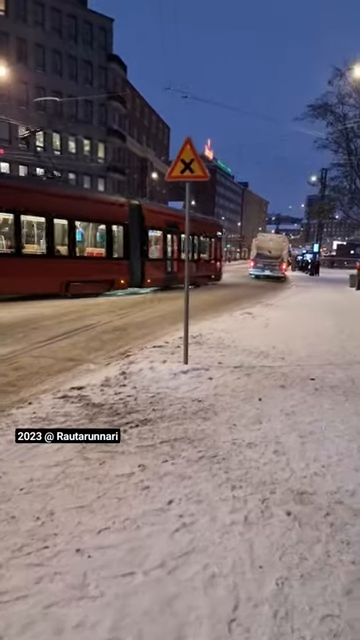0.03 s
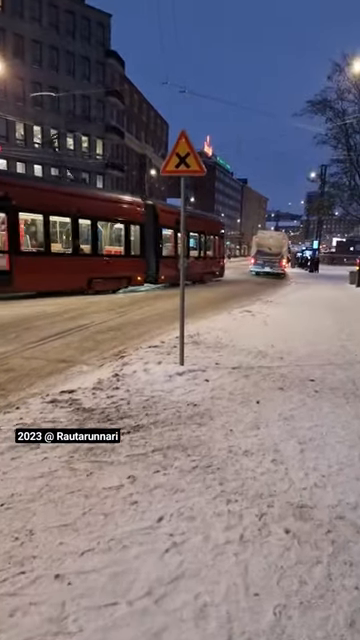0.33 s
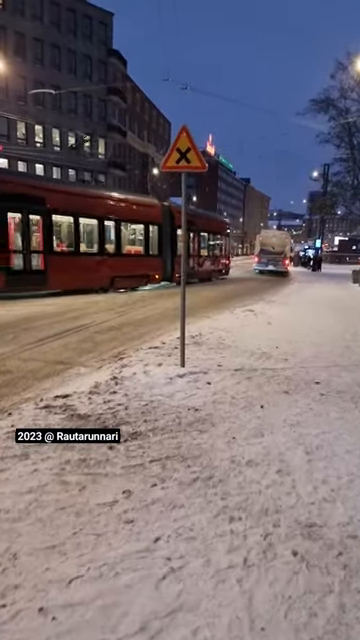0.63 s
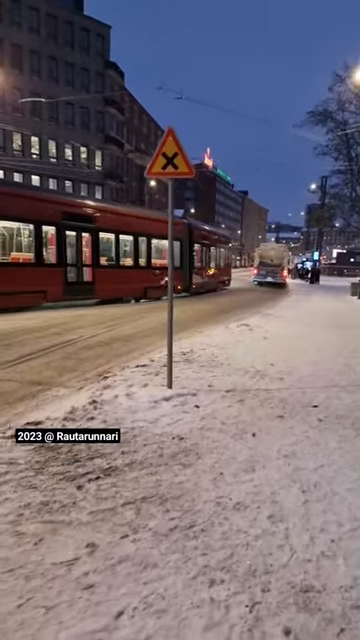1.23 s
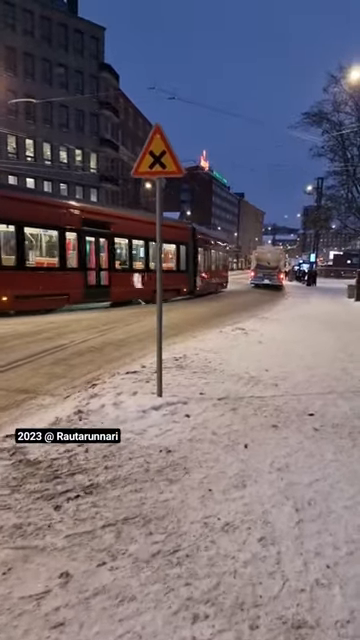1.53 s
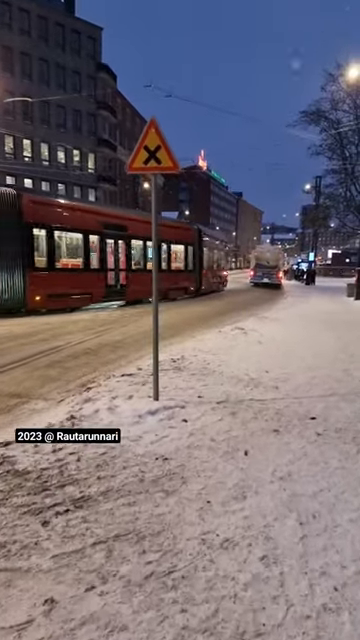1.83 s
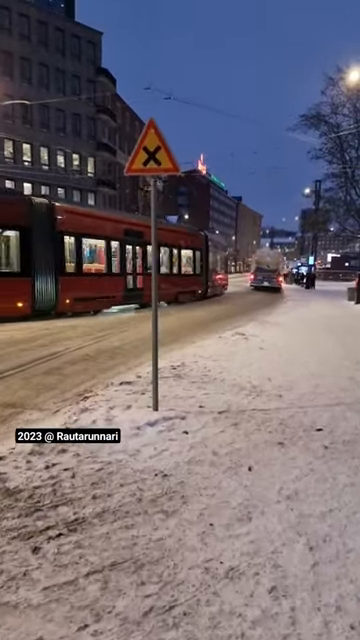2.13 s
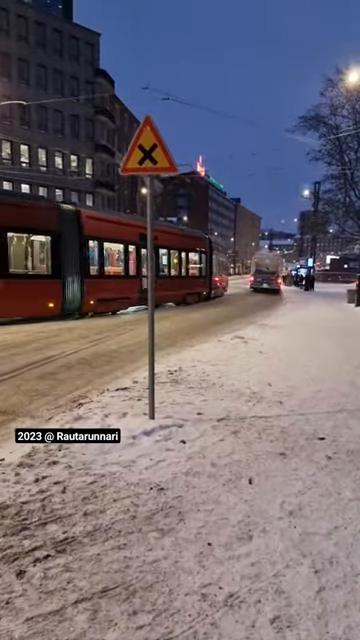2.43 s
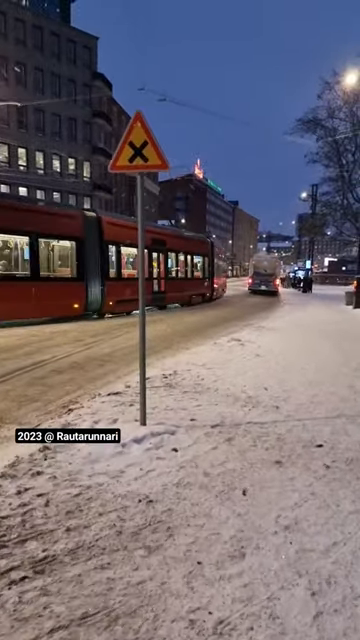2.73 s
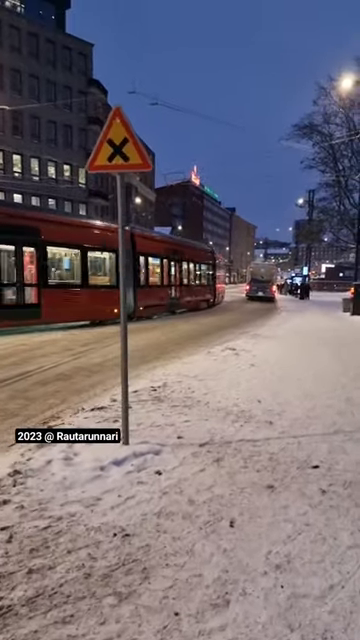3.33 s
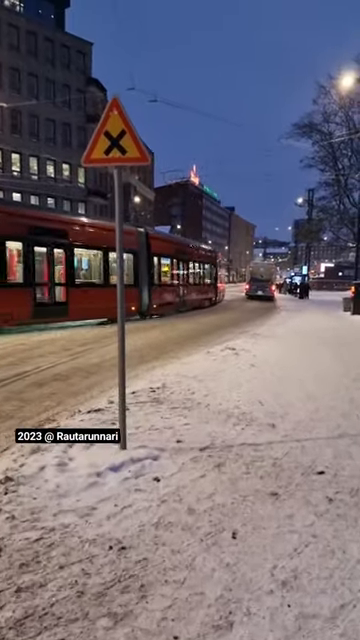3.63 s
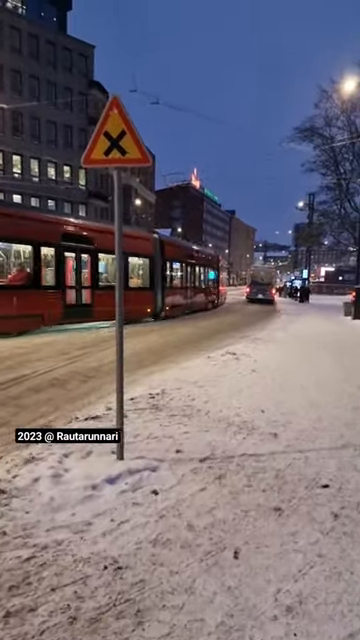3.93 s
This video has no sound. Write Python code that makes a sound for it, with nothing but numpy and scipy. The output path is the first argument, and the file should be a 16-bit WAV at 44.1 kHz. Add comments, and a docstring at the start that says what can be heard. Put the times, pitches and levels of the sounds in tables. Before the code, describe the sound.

Low drone of a passing tram over traffic hiss and soft snowy footsteps.

```python
"""A tram drones over the wash of traffic on a snowy city street, its wheels rumbling on the rails
and setting its body ringing while tyres hiss further off. Icy grit crackles and ticks, a few dry
clacks sound close by, and the wheels moan as they rub the rail. Someone walks alongside with the
microphone: each step thuds softly and hisses in the snow. Near the end, steel squeals thin and faint."""
import sys
import numpy as np
from scipy import signal
from scipy.fft import rfft, irfft
from scipy.io import wavfile
from scipy.ndimage import uniform_filter1d

SR = 44100
rng = np.random.default_rng(int(sys.argv[2]) if len(sys.argv) > 2 else 0)


def wav_record(signal):
    """Record a signal, one row per channel, as 16-bit PCM in the file named by sys.argv[1]."""
    frames = np.transpose(np.atleast_2d(signal))
    bounded = np.clip(frames, -1, 1)
    # unit amplitude maps onto the largest positive 16-bit level
    quanta = np.round(bounded * 32767).astype(np.int16)
    wavfile.write(sys.argv[1], SR, quanta)


N = 176400
TIME_S, BINS_HZ = np.arange(N) / SR, np.fft.rfftfreq(N, 1 / SR)


def amp(db):
    """Decibels to gain."""
    return 10 ** (np.asarray(db) / 20)


def unit_rms(x):
    """Scales to rms 1."""
    return x / np.sqrt(np.mean(x ** 2) + 1e-20)


def curve(table, hz=BINS_HZ):
    """Interpolates a table on a log-frequency axis."""
    freq_hz, value = np.transpose(table)
    return np.interp(np.log(hz + 1), np.log(freq_hz + 1), value)


def pan(left_db):
    """Left and right gains of constant power, left_db louder on the left."""
    gains = np.array([amp(left_db / 2), amp(-left_db / 2)]).reshape(2, -1)
    return gains / np.sqrt(np.mean(gains ** 2, 0))


def drift(rate_hz):
    """Random motion of rms 1, mostly slower than rate_hz."""
    spectrum = rfft(rng.standard_normal(N)) * np.exp(-(BINS_HZ / rate_hz) ** 2)
    return unit_rms(irfft(spectrum * (BINS_HZ > 0), N))


def swell(centre_s, sigma_s):
    """Gaussian envelope of peak 1."""
    return np.exp(-.5 * ((TIME_S - centre_s) / sigma_s) ** 2)


def lowpass(x, hz):
    """The part of a sound under hz."""
    return irfft(rfft(x) / (1 + (BINS_HZ / hz) ** 12), N)


def flicker(x, depth_db, frames, bins):
    """Patches of the spectrum swell and fade at random."""
    spectra = signal.stft(x, nperseg=512)[2]
    field = uniform_filter1d(rng.standard_normal(spectra.shape[1:]), frames, 1)
    field = unit_rms(uniform_filter1d(field, bins, 0))
    return signal.istft(spectra * amp(depth_db * field))[1][:, :N]


# Likeness of the two channels: freq_hz, coherence
STREET_COHERENCE = [(60, 0.98), (300, 1), (400, 0.72), (480, 0.17), (570, 1), (720, 0.87), (980, 0.42),
                    (1380, 0.86), (2000, 0.28), (3500, 0.33), (6000, .08)]
# Phase between the channels: freq_hz, left_lead_rad
STREET_PHASE = [(50, 0.023), (700, 0.01), (900, 0.36), (1200, 1), (1500, 0.32), (2000, 0.63), (3500, 1.1),
                (5000, 1.9)]
def street_noise(gain, left_db):
    """Coloured stereo noise of rms 1: alike in the bass, nearly unrelated in the treble."""
    left, unrelated = rfft(rng.standard_normal((2, N)))
    coherence = np.clip(curve(STREET_COHERENCE), 0, 1)
    right = coherence * left + np.sqrt(1 - coherence ** 2) * unrelated
    right *= np.exp(-1j * curve(STREET_PHASE))
    return unit_rms(irfft(np.array([left, right]) * gain * pan(left_db), N))


# Rolling noise spectrum: freq_hz, level_db
ROLL_SPECTRUM = [(20, -15), (33, -9), (46, -4.5), (75, -1.5), (192, -6.5), (255, -7), (305, -2.5),
                 (358, -2.5), (474, -15), (524, -17), (591, -13.5), (707, -17), (899, -22.5), (1260, -26),
                 (1670, -29.5), (2400, -39.5), (3120, -71), (5280, -120)]
# Stereo balance of tram and traffic: freq_hz, left_db
STREET_BALANCE = [(60, -0.3), (140, -2.5), (330, -7.5), (500, -1.5), (770, -3.5), (1170, -4), (2740, -1.3),
                  (4190, -2.5), (7000, -0.5)]
# Body, motor and wheel resonances: pitch_hz, half_width_hz, level_db, left_db
TRAM_MODES = [(87.4, 3, -42.5, 0), (223.2, 7.4, -41, -2), (308, 26, -43.5, -6), (360.6, 16.6, -41, -10.5),
              (600.5, 8.7, -50, 8), (719.4, 20, -49, -0.5), (1398, 32, -55.5, 3.5), (2726, 160, -64.5, 4.5),
              (4930, 160, -70, 1)]
# Band swells, each taken about its mean: time_s, rumble_db, drone_db, roar_db
TRAM_SWELLS = [(0, -32, -31, -42), (1.1, -34, -33, -42), (1.7, -31, -34.5, -40.5), (2.4, -34, -32.5, -42.5),
               (2.75, -31.5, -32.5, -41), (3.5, -34, -35.5, -42.5), (4, -33, -37, -41)]
CROSSOVER_HZ = 2530  # rolling noise below, tyre hiss above
def tram(roll_db=-28.5):
    """Wheels rumble on the rails and set the body ringing; rumble, drone and roar rise and fall."""
    high_cut = 1 / np.sqrt(1 + (BINS_HZ / CROSSOVER_HZ) ** 12)
    rolling = street_noise(amp(curve(ROLL_SPECTRUM)) * high_cut, curve(STREET_BALANCE))
    sound = amp(roll_db) * flicker(rolling, depth_db=1.5, frames=14, bins=4)
    for pitch_hz, half_width_hz, level_db, left_db in TRAM_MODES:
        resonance = 1 / (1 + ((BINS_HZ - pitch_hz) / half_width_hz) ** 2)
        sound += amp(level_db) * street_noise(resonance, left_db)
    rumble, body = lowpass(sound, hz=250), lowpass(sound, hz=470)
    drone, roar = body - rumble, sound - body
    time_s, *bands_db = np.transpose(TRAM_SWELLS)
    gains = [amp(np.interp(TIME_S, time_s, db - db.mean())) for db in bands_db]
    return sum(band * gain for band, gain in zip((rumble, drone, roar), gains))


# Spectrum of tyres on snow: freq_hz, level_db
TYRE_SPECTRUM = [(1180, -33), (2000, 10), (2200, -8), (2410, -9.5), (2810, -3.5), (3040, -6.5), (3230, -4),
                 (5030, -11), (5920, -18), (6390, -15.5), (11000, -23), (12800, -20), (15400, -27.5)]
# Tyre hiss envelope: time_s, gain_db
TYRE_SWELLS = [(0, -59), (.58, -60.5), (.85, -58), (1.05, -58.5), (1.5, -58), (2.4, -57.5), (3.1, -57),
               (3.5, -58), (4, -59)]
def traffic(fizz_db=-57.5):
    """Tyres on packed snow further off: a hiss that swells and sinks under a steady fizz."""
    low_cut = 1 / np.sqrt(1 + (CROSSOVER_HZ / (BINS_HZ + 1)) ** 12)
    tyres = street_noise(amp(curve(TYRE_SPECTRUM)) * low_cut, curve(STREET_BALANCE))
    tyres = flicker(tyres, depth_db=2.54, frames=20, bins=3)
    hiss = lowpass(tyres, hz=5600)
    hiss_db = np.interp(TIME_S, *np.transpose(TYRE_SWELLS))
    return amp(hiss_db) * hiss + amp(fizz_db) * (tyres - hiss)


# Spectrum of an ice click: freq_hz, level_db
ICE_SPECTRUM = [(1000, -20), (4500, 11), (7000, 4.5), (15000, -5.5)]
def ice_crackle(level_db, clicks_per_s=300, spread_db=3.0):
    """Ice crystals snap one by one: bright clicks of uneven size."""
    sizes = amp(spread_db * np.minimum(rng.exponential(1, (2, N)), 4))
    clicks = sizes * rng.choice([-1, 1], (2, N)) * (rng.random((2, N)) < clicks_per_s / SR)
    return amp(level_db) * unit_rms(irfft(rfft(clicks) * amp(curve(ICE_SPECTRUM)), N))


def impacts(events, spectrum, t60_s, rattle_db):
    """Each hit is a sharp impulse and a brief rattle, both coloured by what is struck."""
    out, t = np.zeros((2, N)), np.arange(4096) / SR
    log_gain = np.log(amp(curve(spectrum, abs(np.fft.fftfreq(len(t), 1 / SR)))))
    ring = np.fft.ifft(np.exp(np.conj(signal.hilbert(log_gain)))).real  # minimum phase
    for start_s, peak_db, left_db in events:
        rattle = rng.standard_normal((2, len(t))) * amp(-60 * t / t60_s)
        rattle /= np.linalg.norm(rattle, axis=1, keepdims=True)
        force = (t == 0) + amp(rattle_db) * rattle
        burst = signal.fftconvolve(force, ring[None])[:, :len(t)] * pan(left_db)
        slot = out[:, round(start_s * SR):][:, :len(t)]
        slot += (amp(peak_db) * burst / abs(burst).max())[:, :slot.shape[1]]
    return out


# Dry clacks: start_s, peak_db, left_db
CLACKS = [(.0184, -25, -16), (2.8103, -31, -8), (2.8876, -25, -10), (3.3006, -29, -10), (3.8552, -22, -13)]
# Clack spectrum: freq_hz, level_db
CLACK_SPECTRUM = [(200, -33), (700, -8), (1200, 13), (1700, 5), (2500, -15), (10000, -52)]
def clacks():
    """Short, dry knocks close by on the right."""
    return impacts(CLACKS, CLACK_SPECTRUM, t60_s=0.02, rattle_db=-10)


# Wheel moans: centre_s, pitch_hz, level_db
WHEEL_MOANS = [(.17, 355, -34.5), (1.74, 636, -39.5), (2.29, 582, -45), (2.6, 4290, -61),
               (2.74, 783, -43.5), (3.215, 661, -41.5), (3.66, 660, -42)]
def wheel_moans(waver=0.007, roughness=0.9):
    """A wheel rubs the rail: one mode swells out of the roar and sinks back."""
    out = np.zeros(N)
    for centre_s, pitch_hz, level_db in WHEEL_MOANS:
        phase = 2 * np.pi * np.cumsum(pitch_hz * (1 + waver * drift(rate_hz=22.3))) / SR
        tone = unit_rms((1 + roughness * drift(rate_hz=44)) * np.sin(phase))
        out += amp(level_db) * swell(centre_s, sigma_s=0.031) * tone
    return out * pan(left_db=-3.0)


# Footfalls: centre_s, thud_db, snow_db
FOOTFALLS = [(.46, -30, -62), (.74, -35.5, -59), (.89, -42, -60.5), (1.16, -31, -62), (1.32, -28, -57),
             (1.65, -40, -62), (2.14, -28.5, -58), (2.38, -31, -74), (2.6, -31, -61), (2.87, -33.5, -59.5),
             (3.25, -28, -54.5), (3.68, -29.5, -54.5), (3.85, -30, -70)]
# Spectra of a thud and of trodden snow: freq_hz, level_db
THUD_SPECTRUM = [(15, -23), (35, -13), (55, -6), (80, -2.5), (115, -9), (180, -19), (400, -22.5),
                 (1000, -74)]
SNOW_SPECTRUM = [(200, -22), (900, -9), (2200, 5.5), (3500, 6), (6000, -4), (10000, -10.5), (15000, -12)]
def footsteps(crunch_db=4.0):
    """Each step jolts the microphone with a soft thud and presses hiss and snaps out of the snow."""
    jolt = sum(amp(db) * swell(centre_s, sigma_s=0.069) for centre_s, db, _ in FOOTFALLS)
    press = sum(amp(db) * swell(centre_s, sigma_s=0.045) for centre_s, _, db in FOOTFALLS)
    hiss = street_noise(amp(curve(SNOW_SPECTRUM)), left_db=-1)
    grains = unit_rms(hiss * amp(crunch_db * drift(rate_hz=250)))
    thud = street_noise(amp(curve(THUD_SPECTRUM)), left_db=-1)
    return jolt * thud + press * (grains + ice_crackle(level_db=-10))


# Ticks of grit: start_s, peak_db, left_db
GRIT_TICKS = [(.7383, -37, -8), (1.2219, -38, -4), (1.7635, -42, -8), (2.078, -39, -9), (3.0453, -34, -10)]
def grit_ticks():
    """Icy grit gives a few bright, scratchy ticks."""
    return impacts(GRIT_TICKS, ICE_SPECTRUM, t60_s=0.009, rattle_db=3.5)


# Squeal envelope: time_s, level_db
SQUEAL_LEVELS = [(2.88, -82), (2.96, -73), (3.015, -59), (3.06, -74), (3.11, -61), (3.19, -69),
                 (3.28, -63.5), (3.35, -71), (3.42, -65), (3.54, -71), (3.62, -65), (3.7, -68), (3.81, -85)]
def squeal(pitch_hz=12106, waver_hz=9, skirt_hz=76, roughness=0.86):
    """Steel rubs on steel: one high, wavering mode with a noisy skirt."""
    phase = 2 * np.pi * np.cumsum(pitch_hz + waver_hz * drift(rate_hz=24)) / SR
    channels = []
    for angle in (phase, phase + np.pi / 2):
        skirt = drift(skirt_hz) * np.cos(angle) + drift(skirt_hz) * np.sin(angle)
        channels.append(np.cos(angle) + roughness * skirt)
    time_s, level_db = np.transpose(SQUEAL_LEVELS)
    gate = (TIME_S > time_s[0]) & (TIME_S < time_s[-1])
    envelope = amp(np.interp(TIME_S, time_s, level_db)) * gate
    return unit_rms(np.array(channels)) * envelope * pan(left_db=5.0)


def scene():
    """Tram, traffic, ice and the walker together."""
    clicks = clacks() + grit_ticks() + ice_crackle(level_db=-74)
    return clicks + tram() + wheel_moans() + squeal() + traffic() + footsteps()


def record(dry, cutoff_hz=15400, fade_s=0.003):
    """Fades both ends and applies a steep band limit."""
    fade = np.minimum(np.minimum(TIME_S, TIME_S[::-1]) / fade_s, 1)
    band_limit = signal.ellip(10, .05, 70, cutoff_hz, fs=SR, output="sos")
    return signal.sosfiltfilt(band_limit, dry * fade)


dry = scene()
out = record(dry)
wav_record(out)
```